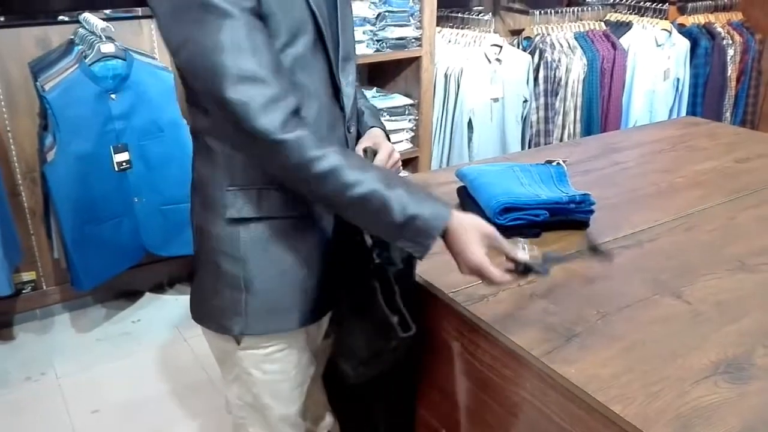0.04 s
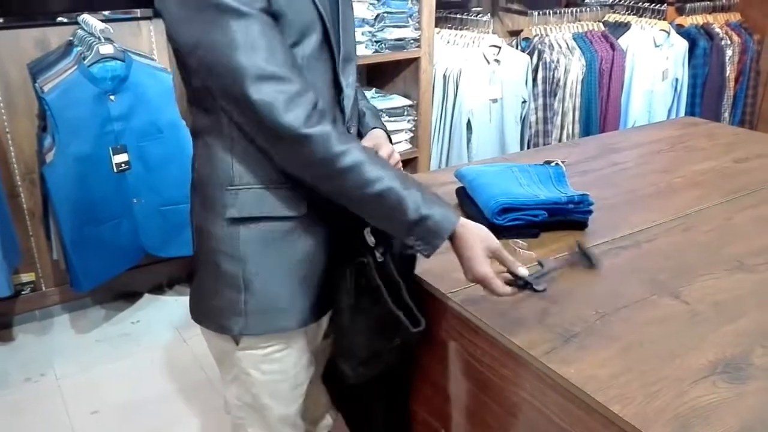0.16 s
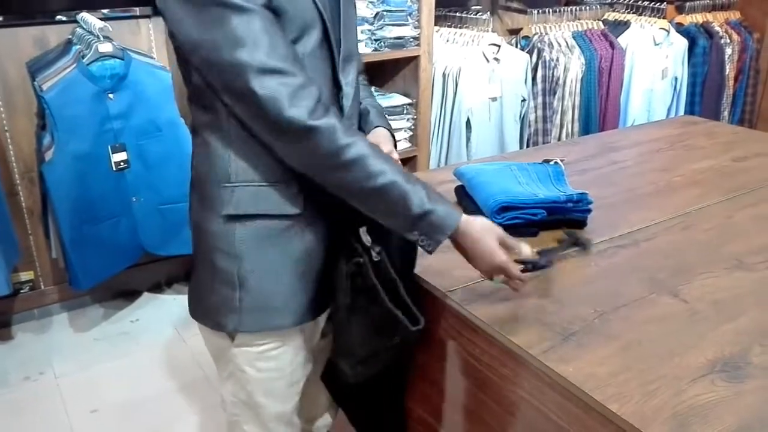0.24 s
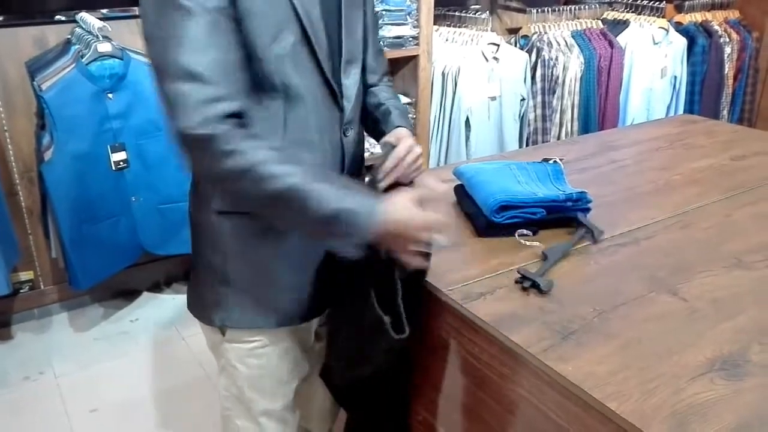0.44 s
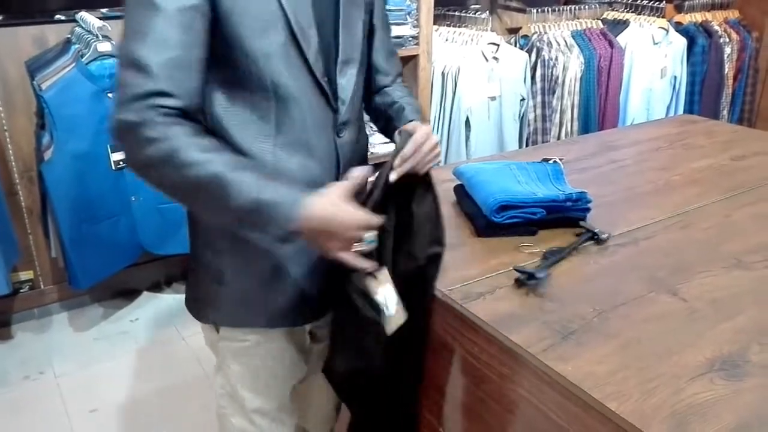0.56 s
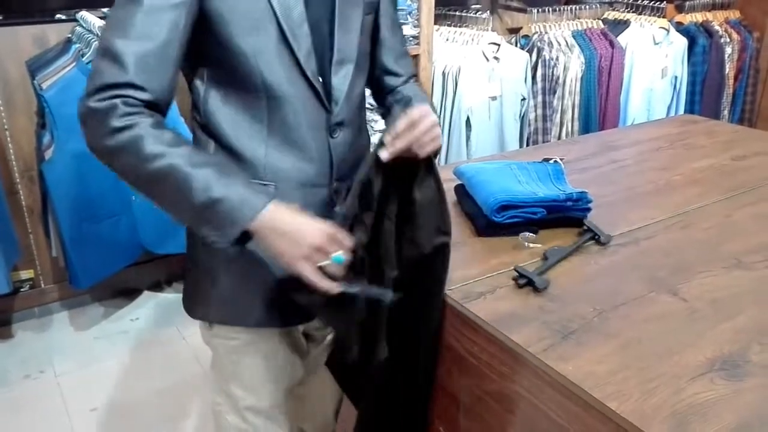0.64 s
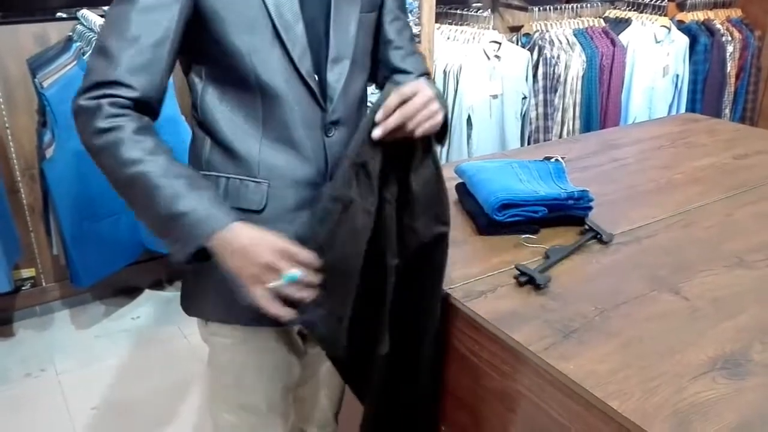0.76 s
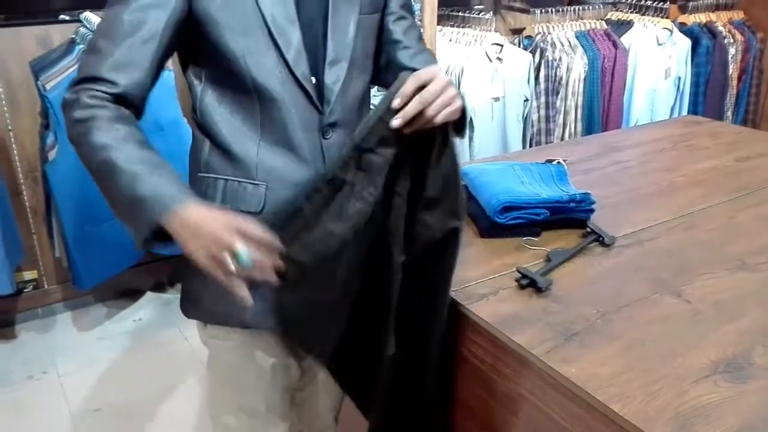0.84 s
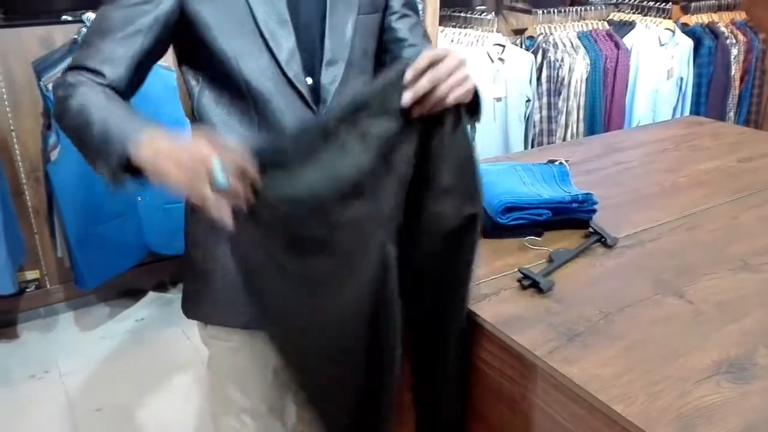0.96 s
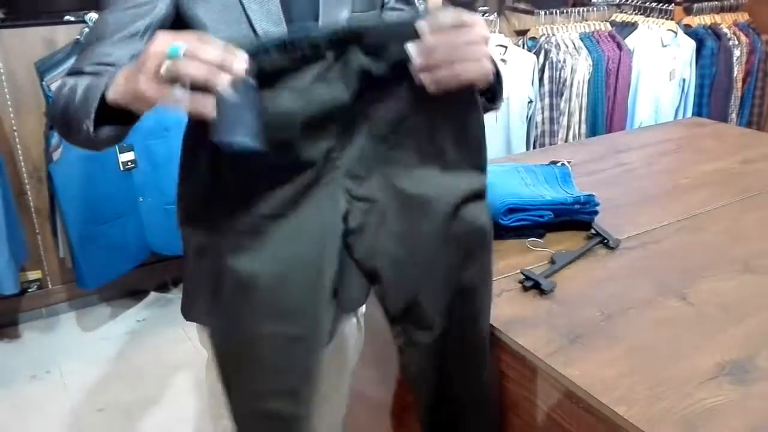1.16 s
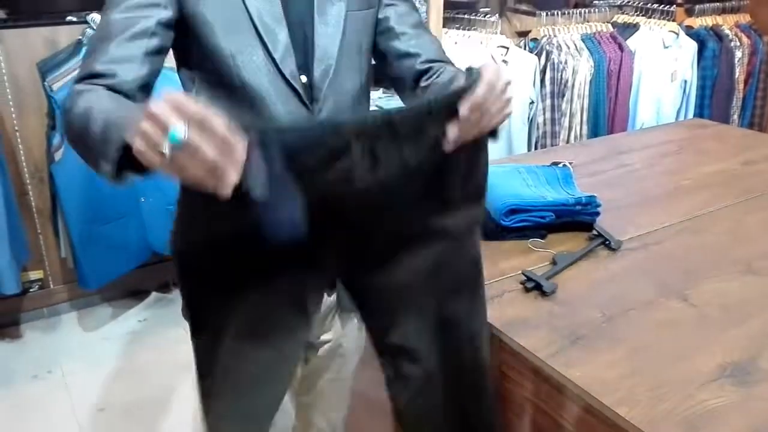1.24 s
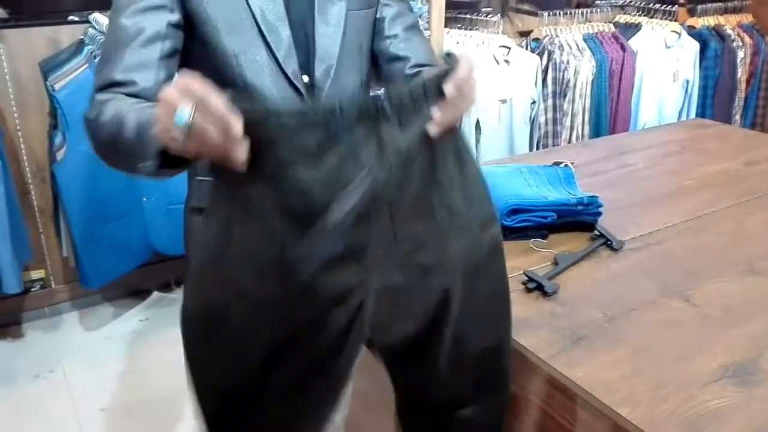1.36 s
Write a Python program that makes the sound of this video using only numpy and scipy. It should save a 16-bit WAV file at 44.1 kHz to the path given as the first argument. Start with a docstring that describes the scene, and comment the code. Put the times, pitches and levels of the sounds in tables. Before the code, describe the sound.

A plastic hanger hits a wooden counter with a sharp, close clack at about 0.2 seconds. It bounces, then clatters and skids from 0.4 to 0.8 seconds, with high pings from its metal clips and hollow knocks from the wood. Trousers rustle faintly from 0.8 to 1.4 seconds, with a faint tick and a small sharp click just after 1 second. A low hum fills the small shop.

```python
"""A plastic clip hanger tossed onto a wooden shop counter, its metal clips facing the microphone.
One sharp clack, a bounce, then a clatter as it skids to rest. Each contact cracks the plastic,
rings the frame and knocks the board; jolts ping the sprung clips, heavy blows boom in the counter.
Trousers are then shaken out with faint rustles, among them a faint tick and a small sharp click.
Behind it all, a small shop room and its low hum."""
import sys
import numpy as np
from scipy import signal
from scipy.fft import rfft, irfft
from scipy.io import wavfile

SR = 44100
rng = np.random.default_rng(int(sys.argv[2]) if len(sys.argv) > 2 else 0)


def waveform_to_disk(signal):
    """Save audio, clipped to [-1, 1], as 16-bit WAV at the path in sys.argv[1]."""
    frames = np.transpose(np.atleast_2d(signal))
    scaled = np.clip(frames, -1, 1) * 32767
    samples = np.round(scaled).astype(np.int16)
    wavfile.write(sys.argv[1], SR, samples)


N = 61739

# The hanger hits the counter; the last row is a faint separate tick afterwards.
# Each row: start in seconds, crack level in dB, crack t60 in seconds, treble tilt in dB per octave,
# struck part's resonance in Hz, board level in dB, frame level in dB.
CONTACTS = [(0.2230, 1, 0.0091, 1.5, 2880, -17.5, -5), (0.2262, 10.5, 0.0074, 1.5, 3000, -1, 2),
            (0.23, -4.5, 0.011, 0.5, 5200, -23, -8), (0.2375, -13, 0.0038, 3, 7700, -35, -18),
            (0.2755, -6.5, 0.012, 2, 3000, -24.5, -7.5), (0.3756, -3, 0.0091, 4.5, 6440, -30, -7),
            (0.3829, 3.5, 0.0037, 3, 7100, -25.5, -8), (0.3886, -7, 0.044, -2, 6600, -15.5, -9),
            (0.396, -3, 0.027, 1, 3400, -27, -10), (0.4469, -5, 0.024, -2, 3480, -25, -18),
            (0.4553, 0.5, 0.021, -4, 5370, -16, -15), (0.4602, -2.5, 0.024, 6.5, 4500, -32, -8),
            (0.465, -1.5, 0.014, 2, 5600, -36, -12), (0.4829, -2, 0.0041, -1.5, 5100, -16, -11),
            (0.4923, -4, 0.0067, 1, 7700, -22.5, -11), (0.494, 4.5, 0.028, 2, 5300, -18.5, -8),
            (0.503, -6, 0.046, -3.5, 5400, -33, -13), (0.5285, -11, 0.021, -3, 9300, -44, -17),
            (0.5542, -3.5, 0.022, 2.5, 4100, -23.5, -15), (0.5768, -9, 0.024, 3, 4200, -31, -13),
            (0.6050, -2, 0.0174, 1, 5400, -37, -8), (0.612, -14.5, 0.031, -9, 1770, -25, -11),
            (0.6534, -9, 0.015, -4.5, 4320, -21.5, -7), (0.6670, -2.5, 0.017, -1, 4360, -17.5, -2.5),
            (0.6823, -12, 0.02, -4, 3430, -38, -27), (0.7095, -20, 0.05, -1, 1750, -14, -15.5),
            (0.7505, -23, 0.01, 0, 5400, -23.5, -28), (0.7997, -8.5, 0.026, -0.5, 4830, -31, -14),
            (1.0225, -39, .012, -5, 2850, -66, -41)]
# Colours of the plastic's crack and the board's knock. Each row: frequency in Hz, relative level in dB.
CRACK_COLOUR = [(300, -34), (1200, -16), (2200, -7.5), (2900, -5), (4200, -1), (6350, -3.5), (7500, -2),
                (9400, -1), (10600, -12.5), (12800, -9.5), (14500, -21.5), (16000, -25)]
BOARD_COLOUR = [(60, -4), (200, -3.5), (550, -0.5), (800, -2.5), (1200, 1), (1900, -5.5), (3000, -10.5),
                (8000, -36)]
BOARD_T60_SHARE, TILT_PIVOT_HZ = 0.65, 4970  # the share is of the crack's t60
# The plastic frame's modes. Each row: frequency in Hz, relative level in dB, t60 in seconds.
FRAME_MODES = [(1738, -7, 0.051), (2785, -4, .085), (2982, -1, 0.04), (3290, 2.5, .045), (3590, 1.5, 0.04),
               (4070, 2.5, 0.049), (4472, -1.5, .035), (5120, -1, 0.046), (5400, -1, 0.076),
               (7080, -0.5, 0.057), (7670, -1.5, .07), (9640, -7, 0.046)]
PART_DB, FOCUS_DB = 6, 13  # lift at the struck part's resonance: in the crack, in the modes
PART_HALF_WIDTH_OCTAVES, MODE_SCATTER_DB, MODE_JITTER = .15, 3, 0.006

# Jolts of the metal clips. Each row: start in seconds, level in dB, pitch in Hz.
CLIP_JOLTS = [(0.2230, -7, 8300), (0.226, 1.5, 8350), (0.277, -7, 8550), (0.293, -10.5, 8050),
              (0.4557, -5.5, 8040), (0.483, 2, 8430), (0.4921, 3, 8100), (0.606, -2.5, 8080),
              (0.6535, -4.5, 8230), (0.6674, -6.5, 8150), (0.6819, -6, 8300), (0.703, -14, 8120),
              (0.739, -17.5, 8040), (0.7505, -17, 8250), (0.7890, -18, 7950), (0.841, -24.5, 8040),
              (1.0231, -33.5, 7930)]
# The clips' modes. Each row: multiple of the pitch, relative level in dB, t60 in seconds.
CLIP_MODES = [(1, 1, 0.014), (1.036, -11.5, 0.03), (1.11, -11.5, 0.02), (1.47, -17.5, .02)]
CLIP_ROOM_DB = -6.5  # the clips face the microphone and send less into the room

# Heavy blows on the counter. Each row: start in seconds, level in dB, favoured resonance in Hz.
HEAVY_BLOWS = [(0.225, -14, 159), (0.270, -15.5, 71.6), (0.488, -12, 208), (0.525, -17.5, 90),
               (0.706, -20.5, 207), (0.812, -20.5, 185)]
# The hollow counter's modes. Each row: frequency in Hz, relative level in dB.
COUNTER_MODES = [(33, -2), (72, -5), (95, -2.5), (160, -1), (186, -3), (208, -0.5)]
COUNTER_T60_S = .18

# Level curves of the skid and the handled trousers. Each row: time in seconds, level in dB.
SKID_LEVELS = [(0.37, -56), (0.40, -46), (0.44, -40.5), (0.50, -38), (0.54, -45), (0.615, -37.5),
               (0.645, -43), (0.72, -42), (0.755, -45), (0.78, -86)]
CLOTH_LEVELS = [(0.76, -54), (0.83, -49.5), (0.89, -51), (0.945, -60.5), (0.965, -73.5), (1.14, -75),
                (1.19, -66), (1.235, -76), (1.26, -65), (1.30, -77)]
# Brisk fabric flicks and, in the second row, one small sharp click.
# Each row: start in seconds, level in dB, t60 in seconds, treble tilt in dB per octave.
FLICKS_AND_CLICK = [(0.02, -42, 0.019, 6), (1.057, -32, 0.031, 1.5), (1.194, -44.5, 0.084, 3.5),
                    (1.342, -40.5, 0.062, 3)]
# Colours of the skid, flicks and click, rustle and hum. Each row: frequency in Hz, relative level in dB.
SCRAPE_COLOUR = [(40, -3.5), (240, 2.5), (400, -5.5), (1100, -5), (1750, 3), (2500, -4.5), (5000, 1),
                 (16000, -23)]
FLICK_CLICK_COLOUR = [(400, -5), (1400, 7.5), (2400, -5.5), (4000, -1), (4900, 6), (5800, -5.5), (7700, 0),
                      (16000, -26.5)]
RUSTLE_COLOUR = [(40, -4), (110, -1), (190, 13), (380, -10.5), (800, -4), (1500, 1), (2400, -8),
                 (5000, -10.5), (16000, -21)]
HUM_COLOUR = [(25, -5), (80, -9), (150, -15), (250, -20), (700, -35), (1300, -29), (2200, -33.5),
              (13600, -41.5), (15000, -55.5)]

# The shop's reverberant tail. Each row: band centre in Hz, level in dB, t60 in seconds.
ROOM_BANDS = [(100, 0.5, 0.56), (395.7, -12, 0.53), (1610, -9.5, 0.31), (4500, -12, 0.4),
              (9000, -7.5, 0.32), (14970, -2.5, 0.15)]
ROOM_GAP_S, ROOM_BUILD_S, EARLY_DB, EARLY_T60_S = 0.004, 0.0014, -10.5, 0.079
HUM_DB, TOP_HZ = -64, 15900


def hanger():
    """At each contact the plastic cracks, the frame rings and the board knocks; a faint tick follows."""
    out, board = np.zeros(N), response(BOARD_COLOUR)
    for start, crack_db, t60, tilt_db, part_hz, board_db, frame_db in CONTACTS:
        plastic = response(CRACK_COLOUR, tilt_db, part_hz, PART_DB)
        add(out, start, undb(crack_db) * burst(t60, plastic))  # longer when it grazes
        add(out, start, undb(frame_db) * ring(struck_at(FRAME_MODES, part_hz)))
        add(out, start, undb(board_db) * burst(t60 * BOARD_T60_SHARE, board))
    return out


def clips():
    """The sprung metal clips ping when jolted, a little higher or lower each time."""
    out = np.zeros(N)
    for start, ping_db, hz in CLIP_JOLTS:
        modes = [(hz * ratio, db, t60) for ratio, db, t60 in CLIP_MODES]
        add(out, start, undb(ping_db) * ring(modes))
    return out


def counter():
    """The hollow counter booms under the heavier blows, at a pitch set by where they land."""
    out = np.zeros(N)
    modes = [(hz, db, COUNTER_T60_S) for hz, db in COUNTER_MODES]
    for start, db, boom_hz in HEAVY_BLOWS:
        add(out, start, undb(db) * ring(struck_at(modes, boom_hz)))
    return out


def skid():
    """The hanger scrapes along the countertop until it stops."""
    sliding = np.arange(N) / SR < SKID_LEVELS[-1][0]
    return friction(SKID_LEVELS, SCRAPE_COLOUR, slips_per_s=5000, spread_db=2) * sliding


def flicks_and_click():
    """Short swishes of flicked fabric, and one small sharp click."""
    out = np.zeros(N)
    for start, db, t60, tilt_db in FLICKS_AND_CLICK:
        add(out, start, undb(db) * burst(t60, response(FLICK_CLICK_COLOUR, tilt_db)))
    return out


def rustle():
    """The trousers rub as they are handled, faint and dry at the microphone."""
    return friction(CLOTH_LEVELS, RUSTLE_COLOUR, slips_per_s=4100, spread_db=3)


def room(sound):
    """Early reflections off the nearby counter and shelves, then a diffuse tail, shorter in the treble."""
    t, hz = np.arange(N) / SR, np.fft.rfftfreq(N, 1 / SR)
    onset = 1 - np.exp(-np.maximum(t - ROOM_GAP_S, 0) / ROOM_BUILD_S)
    noise_spectrum = rfft(rng.standard_normal(N))
    echoes = undb(EARLY_DB) * unit(rng.standard_normal(N) * onset * fade(EARLY_T60_S))
    for centre, db, t60 in ROOM_BANDS:
        band = on_log(hz, [(row[0], row[0] == centre) for row in ROOM_BANDS])
        echoes += undb(db) * irfft(noise_spectrum * band, N) * unit(onset * fade(t60))
    return through(sound, echoes)


def hum():
    """The shop's room tone: steady noise, strongest in the bass."""
    return undb(HUM_DB) * through(rng.standard_normal(N), response(HUM_COLOUR))


def burst(t60, body, size=4096):
    """A crackle of many damped modes that swells at once and dies, coloured by a body's response."""
    envelope = unit(fade(t60, size) * np.sqrt(np.arange(size)))
    crackle = rng.standard_normal(size) * envelope
    for _ in range(2):  # even out the spectrum, then hold the peaks near the envelope
        spectrum = rfft(crackle)
        whitened = unit(irfft(spectrum / (abs(spectrum) + 1e-12)))
        crackle = np.clip(whitened, -2 * envelope, 2 * envelope)
    return unit(through(unit(crackle), body))


def ring(modes, size=14000):
    """Struck modes die away; each strike scatters their level, pitch and polarity."""
    t, out = np.arange(size) / SR, np.zeros(size)
    for hz, db, t60 in modes:
        scatter, detune, polarity = rng.standard_normal(3)
        gain = np.sign(polarity) * undb(db + MODE_SCATTER_DB * scatter)
        out += gain * fade(t60, size) * np.sin(2 * np.pi * hz * (1 + MODE_JITTER * detune) * t)
    return unit(out)


def struck_at(modes, centre_hz):
    """The point of contact favours the modes around one frequency."""
    return [(hz, db + FOCUS_DB * bell(hz, centre_hz), t60) for hz, db, t60 in modes]


def friction(levels, colour, slips_per_s, spread_db):
    """Dense tiny slips of uneven size under a level curve."""
    slips = (rng.random(N) < slips_per_s / SR) * rng.standard_normal(N)
    slips *= undb(spread_db * np.minimum(rng.exponential(size=N), np.pi))
    times, db = np.array(levels).T
    gain = undb(np.interp(np.arange(N) / SR, times, db, left=-np.inf))
    return through(unit(slips) * np.sqrt(N) * gain, response(colour))


def response(colour, tilt_db=0, peak_hz=1, peak_db=0, size=4096):
    """Unit-energy impulse response of a colour with a treble tilt and one resonance."""
    hz = np.maximum(np.fft.rfftfreq(size, 1 / SR), 1)
    tilt = tilt_db * np.log2(np.maximum(hz, TILT_PIVOT_HZ / 2) / TILT_PIVOT_HZ)
    peak = peak_db * bell(hz, peak_hz)
    cepstrum = irfft(np.log(undb(on_log(hz, colour) + tilt + peak)))
    cepstrum[1:size // 2] *= 2  # fold to minimum phase
    cepstrum[size // 2 + 1:] = 0
    return unit(irfft(np.exp(rfft(cepstrum))))


def bell(hz, centre_hz):
    """A resonance's shape, 1 at its centre."""
    return 1 / (1 + (np.log2(hz / centre_hz) / PART_HALF_WIDTH_OCTAVES) ** 2)


def undb(db):
    """Decibels to gain."""
    return 10 ** (np.asarray(db) / 20)


def unit(x):
    """Scale to an energy of one."""
    return x / np.sqrt(np.sum(x ** 2) + 1e-18)


def fade(t60, size=N):
    """Exponential decay, 60 dB down after t60 seconds."""
    return np.exp(-np.log(1000) * np.arange(size) / SR / max(t60, 1e-4))


def on_log(hz, points):
    """Read a table on a log-frequency axis."""
    frequencies, values = np.array(points, float).T
    return np.interp(np.log(np.maximum(hz, 1)), np.log(frequencies), values)


def through(sound, impulse_response):
    """Filter by an impulse response."""
    return signal.fftconvolve(sound, impulse_response)[:N]


def add(out, start, sound):
    """Mix a sound in at a start time in seconds."""
    i = int(np.clip(start * SR, 0, N - 1))
    out[i:i + len(sound)] += sound[:N - i]


def scene():
    """One microphone in the shop: the hanger up front, cloth, room and hum behind it."""
    background = rustle() + hum()
    clatter, pings = hanger() + skid() + flicks_and_click(), clips()
    reflections = room(clatter + undb(CLIP_ROOM_DB) * pings)
    return (clatter + pings + reflections + counter() + background)[None]


def record(dry):
    """The recorder cuts the top treble steeply."""
    return signal.sosfilt(signal.ellip(10, .2, 70, TOP_HZ, fs=SR, output="sos"), dry)


dry = scene()
out = record(dry)
waveform_to_disk(out)
```